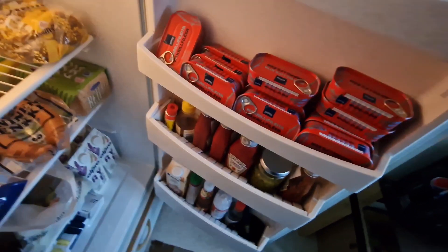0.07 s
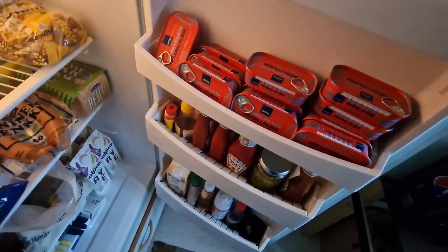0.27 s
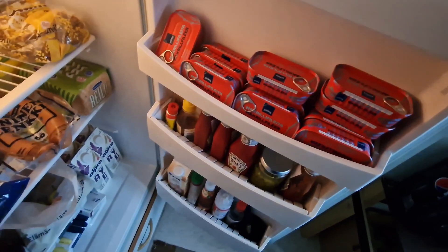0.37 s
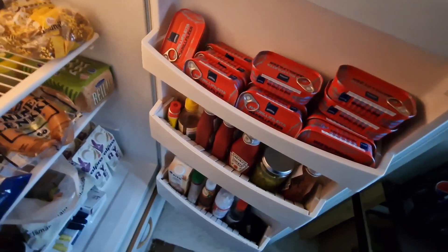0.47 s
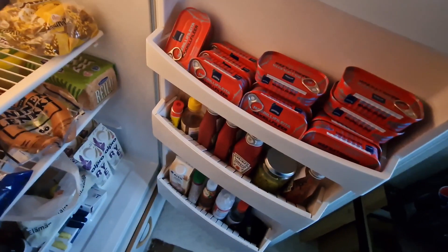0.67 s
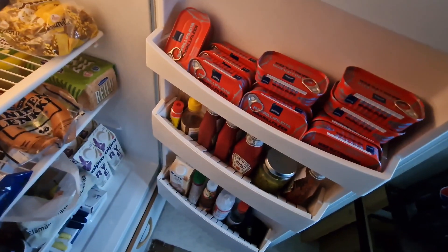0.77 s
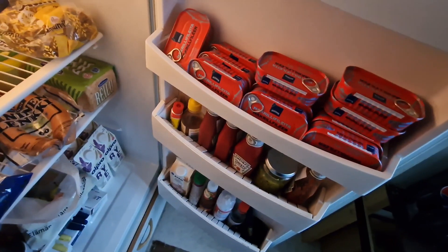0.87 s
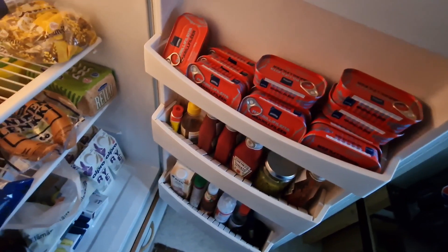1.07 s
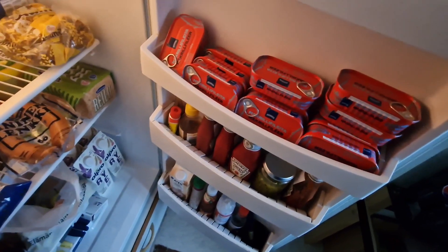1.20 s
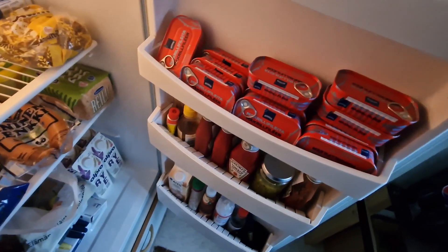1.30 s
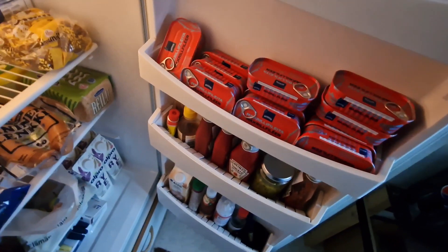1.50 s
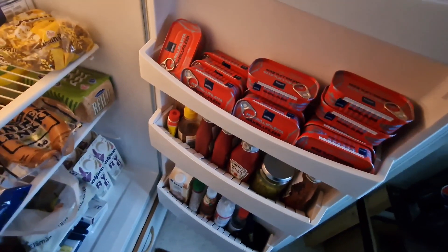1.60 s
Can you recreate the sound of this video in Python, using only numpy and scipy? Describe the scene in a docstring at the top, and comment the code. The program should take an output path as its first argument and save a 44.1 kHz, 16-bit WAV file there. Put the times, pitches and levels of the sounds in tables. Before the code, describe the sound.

Thin plastic wrap crumples close to a handheld phone at an open fridge. Only a faint airy motor hum until 0.17 s, then dense, bright crackling surges, with sharp snaps near 0.23, 0.45 and 0.57 s. It swells again around 0.7-0.95 s, thins near 1.1, revives at 1.2-1.3, then fades into scattered ticks, with a small renewed crackle at 1.64. Dull low handling bumps come around 0.95-1.4 s; short hard reflections.

```python
"""A fridge hums faintly, then a thin plastic wrap is crumpled and dragged close to a phone before its open door.
Fridge: shaped noise plus wavering motor tones. Hand on the phone: banded rumble and low decaying bumps.
Wrap: thousands of tiny noise bursts from spots of differing pitch, plus single loud snaps;
a shifting air pocket lifts one band, and the hard fridge inside adds a short noise-like tail."""
import sys
import numpy as np
from scipy import signal
from scipy.fft import rfft, irfft, next_fast_len
from scipy.io import wavfile
from scipy.ndimage import uniform_filter1d

SR = 44100
rng = np.random.default_rng(int(sys.argv[2]) if len(sys.argv) > 2 else 0)


def inscribe(sig):
    """Save sig as 16-bit PCM at rate SR to the path in sys.argv[1].

    A 1-D sig is mono; a 2-D sig holds one channel per row.
    Samples are clipped to [-1, 1] before scaling.
    """
    pcm = np.round(np.clip(np.atleast_2d(sig).T, -1, 1) * 32767)
    wavfile.write(sys.argv[1], SR, pcm.astype(np.int16))


N = 72765
T = np.arange(N) / SR
BODY_HZ = 895  # crossover between low body and treble
LAG_S, LAG_SPREAD_S = 0.00044, 0.0002418  # treble delay of left port: mean, spread over spots
BODY_LAG_S, BODY_LAG_SHARE = 0.0001, 0.09  # low-body delay: base, plus share of the treble delay
HAND_LR = np.array([[.8], [1.2]])  # hand gain at left, right port


def undb(db):
    """Amplitude ratio of a level in dB."""
    return 10 ** (np.asarray(db) / 20)


def unit(x):
    """Scale to unit rms."""
    return x / np.sqrt(np.mean(x ** 2))


def curve(table, col):
    """A table column over time; -120 before its first row."""
    a = np.array(table, float)
    return np.interp(T, a[:, 0], a[:, col], left=-120)


def table_db(table):
    """Gain in dB over log frequency, from (f/Hz, level/dB) rows."""
    a = np.array(table, float)
    return lambda hz: np.interp(np.log(hz), np.log(a[:, 0]), a[:, 1])


def slope(hz, corner_hz, order=4):
    """dB of a low-pass; a negative order makes a high-pass."""
    return -10 * np.log10(1 + (hz / corner_hz) ** order)


def bump(centre_hz, octaves, floor_db):
    """Broad hump in dB: 0 at the centre, floor_db far away."""
    return lambda hz: floor_db * (1 - np.exp(-.5 * (np.log2(hz / centre_hz) / octaves) ** 2))


def colour(x, db_of_hz, late_s=0.):
    """Zero-phase filter by a gain in dB per frequency, plus a delay."""
    n = next_fast_len(N + 4096)
    hz = np.maximum(np.arange(n // 2 + 1) * SR / n, 1)
    response = undb(db_of_hz(hz)) * np.exp(-2j * np.pi * hz * late_s)
    return irfft(rfft(x, n) * response, n)[..., :N]


def bursts(at_s, size, decay_s):
    """Random-sign noise whose power jumps at each time and decays exponentially."""
    kick = np.zeros(N)
    np.add.at(kick, np.clip((at_s * SR).astype(int), 0, N - 1), size ** 2)
    fade = np.exp(-2 / (decay_s * SR))
    envelope = np.sqrt(signal.lfilter([1 - fade], [1, -fade], kick))
    return envelope * np.sign(rng.standard_normal(N))


def ports(x, late_s, pan_db, shape, body=1.):
    """One spot at two ports: treble delayed at left and panned, low body nearly shared."""
    high = lambda hz: shape(hz) + slope(hz, BODY_HZ, order=-4)
    low = lambda hz: shape(hz) + slope(hz, BODY_HZ)
    body_late_s = BODY_LAG_S + BODY_LAG_SHARE * late_s
    left = colour(x, high, late_s) * undb(pan_db / 2) + body * colour(x, low, body_late_s)
    right = colour(x, high) * undb(-pan_db / 2) + body * colour(x, low)
    return np.array([left, right])


# fridge and kitchen air, relative spectrum: f/Hz, density/dB
AIR_SPECTRUM = [(18, -61), (30, -16), (218, -31), (311, -28.5), (344, -44), (400, -15.5), (466, -27),
                (571, -25), (617, -30), (700, -26.5), (1020, -38.5), (1620, -32.5), (1790, -40),
                (2200, -29), (2620, -43), (4360, -40), (5080, -55.5), (8440, -53), (13000, -69)]
# motor tones: f/Hz, mean level/dB
MOTOR_TONES = [(398.4, -63.5), (1421, -76), (1604, -72), (2046, -77)]
AIR_RMS_DB = -59.5  # shared (mid) part
DIM_START_S, DIM_RAMP_S, DIM_DB = 1.3, 0.18, -26  # hum below about 1 kHz grows fainter


def fridge():
    """Wide shaped air noise plus motor tones wavering in level and pitch."""
    mid, side = (colour(rng.standard_normal(N), table_db(AIR_SPECTRUM)) for _ in range(2))
    side = colour(side, table_db([(300, -9), (3000, 2)]))
    hum = undb(AIR_RMS_DB) * (mid + side * np.array([[1], [-1]])) / np.sqrt(np.mean(mid ** 2))
    for hz, db in MOTOR_TONES:
        waver, drift = (unit(uniform_filter1d(rng.standard_normal(N), 2500)) for _ in range(2))
        phase = 2 * np.pi * np.cumsum(hz * (1 + .004 * drift)) / SR
        hum = hum + undb(db + 5 * waver) * np.sin(phase)
    dim = undb(DIM_DB * np.clip((T - DIM_START_S) / DIM_RAMP_S, 0, 1))
    high = colour(hum, lambda hz: slope(hz, 1060, order=-4))
    low = colour(hum, lambda hz: slope(hz, 970))
    return high + dim * low


# handling rumble: t/s, level before trim/dB, deepest band re main/dB, creaky upper band re main/dB
GRIP_RUMBLE = [(0.16, -82, -10.5, -10.5), (0.185, -42, -22.5, 1), (0.208, -57, -23, -20),
               (0.408, -52, -28, -21), (0.524, -58, -9, -11), (0.558, -53.5, -26, 10),
               (0.674, -56.5, -21, 15), (0.724, -50, -23, 7.5), (0.782, -46, -25, 5.5),
               (0.812, -40.5, -3, -1), (0.91, -52, -12, 12), (0.948, -37.5, -4, -7),
               (1.01, -42.5, -8, -3.5), (1.044, -46.5, 1, -2), (1.106, -50.5, 7, -2), (1.2, -46.5, -6, 0.5),
               (1.242, -49, 5.5, -1), (1.308, -45.5, 0, -5), (1.362, -52, -7, -4), (1.424, -48.5, 4, -26),
               (1.516, -75, 22, -9), (1.612, -70, 3, 3), (1.65, -48, -33, -2)]
GRIP_TRIM_DB = -3.5


def grip():
    """Hand rubbing the phone: three noise bands of varying balance, nearly alike in both ports."""
    out = 0
    bands = ((67.4, 168, 0), (33, 37, curve(GRIP_RUMBLE, 2)), (214, 450, curve(GRIP_RUMBLE, 3)))
    for lo_hz, hi_hz, rel_db in bands:
        band = lambda hz: slope(hz, lo_hz, order=-8) + slope(hz, hi_hz, order=6)
        mid, side = (unit(colour(rng.standard_normal(N), band)) for _ in range(2))
        out = out + undb(rel_db) * (mid * HAND_LR + 0.36 * side * np.array([[1], [-1]]))
    return undb(curve(GRIP_RUMBLE, 1) + GRIP_TRIM_DB) * out


# hand effort: t/s, crumple level before trim and wrap filters/dB, low body re treble/dB
HAND_EFFORT = [(0.17, -58.5, 24), (0.186, -38, 8.5), (0.204, -35, 5), (0.24, -24.5, 2.5),
               (0.278, -29.5, 0.5), (0.31, -27.5, -1.5), (0.358, -33, -0.5), (0.38, -25, -0.5),
               (0.436, -32, -3.5), (0.545, -33, -2), (0.572, -29.5, -6), (0.626, -27, -0.5),
               (0.68, -35.5, -6), (0.696, -29, -9), (0.714, -34, -1.5), (0.78, -27, 0.5), (0.84, -24, 1),
               (0.886, -29.5, -4), (1.006, -35, 0), (1.068, -48, -6), (1.1, -40, 2), (1.122, -52.5, -12),
               (1.185, -47, -6), (1.2, -36, 4), (1.212, -28, 3), (1.232, -32, -16), (1.254, -27.5, -5),
               (1.3, -31, -13), (1.325, -38, -11), (1.364, -46.5, 10), (1.39, -37, -18), (1.41, -45, 11),
               (1.438, -34, -24), (1.484, -45.5, 2), (1.492, -40.5, -1), (1.55, -55, -17),
               (1.558, -45, 8.5), (1.62, -62, 4), (1.636, -40.5, 5), (1.65, -36, 2.5)]
CREASES, SPOTS = 3300, 14
CROWDING = .7  # crease rate ~ level ** CROWDING
CREASE_DECAY_S, SCATTER_DB, CRUMPLE_TRIM_DB = 0.00078, 1, 1
CALM_DB, CALM_SHARE = -45, .7  # weak effort: creases smaller and more even, down to this share


def crumple():
    """Random creases over spots of the wrap, each spot with its own pitch and direction."""
    effort_db = curve(HAND_EFFORT, 1)
    gain = undb(effort_db)
    rate = gain ** CROWDING
    rate = rate / rate.sum()
    draw, scatter = rng.random((CREASES, 2)), rng.standard_normal(CREASES)
    at_s = np.interp(draw[:, 0], np.cumsum(rate), T)
    lively = np.clip((np.interp(at_s, T, effort_db) - CALM_DB) / 8, CALM_SHARE, 1)
    size = unit(undb(SCATTER_DB * lively * np.clip(scatter, -3, 2.2)))
    # divide out crowding so the summed level follows effort
    size = lively * size * np.interp(at_s, T, gain / np.sqrt(rate * CREASES + 1e-12))
    spot = (draw[:, 1] * SPOTS).astype(int)
    body = undb(curve(HAND_EFFORT, 2))
    out = 0
    for k, (lag, pan) in enumerate(rng.standard_normal((SPOTS, 2))):
        x = bursts(at_s[spot == k], size[spot == k], CREASE_DECAY_S)
        pitch = bump(750 * 23 ** (k / SPOTS), 1.0, -7.5)
        out = out + ports(x, LAG_S + LAG_SPREAD_S * lag, 1.5 * pan, pitch, body)
    return undb(CRUMPLE_TRIM_DB) * out


# single loud creases: t/s, level before trim and filters/dB, centre f/Hz, treble pan L-R/dB
LOUD_SNAPS = [(0.184, -28.5, 5060, 0), (0.233, -17, 12000, 9), (0.2847, -35, 12000, -4),
              (0.4534, -19.5, 10000, 2), (0.5315, -18, 10900, 0.5), (0.5747, -13.5, 1870, 6),
              (0.908, -20, 2300, 0.0), (1.05, -24, 1400, -6), (1.072, -34, 13000, -3.5),
              (1.0796, -33, 6020, -8), (1.085, -31.5, 6940, 6), (1.0993, -28, 8050, -2.0),
              (1.1134, -46, 2140, 0), (1.142, -31, 12000, -1), (1.1528, -30, 1720, 7),
              (1.1676, -32, 3000, -7), (1.178, -30.5, 12500, -3), (1.19, -25, 6800, 6),
              (1.2138, -20, 11000, 0.0), (1.249, -18, 1800, 9), (1.291, -17, 13000, -3),
              (1.3331, -23, 4970, -6), (1.335, -20, 2350, 0.0), (1.457, -22, 1470, -3),
              (1.3887, -27.5, 13100, -5), (1.428, -27.5, 10500, 0.0), (1.4385, -33, 9000, -8),
              (1.441, -25.5, 9600, -3), (1.465, -25, 1480, 8), (1.4917, -26, 7500, 0),
              (1.518, -31.5, 8090, -3), (1.5547, -27.5, 5140, 3), (1.5625, -38.5, 1630, 0),
              (1.578, -40, 3500, 4), (1.5824, -34, 3500, 1), (1.63, -38, 6000, 1.0),
              (1.6381, -25.5, 5900, 0.0), (1.6464, -26.5, 4500, 0)]
SNAP_DECAY_S, SNAP_TRIM_DB = 0.001, -3.5
SNAP_BODY_DB = -8.5  # a single crease has little low body
RING_BELOW_HZ, RING_OCTAVES, WIDE_OCTAVES = 2600, .15, .9  # low snaps ring in a narrow band


def snaps():
    """Loud single creases, each a decaying burst round its own pitch."""
    out = 0
    for (s, db, hz, pan_db), lag in zip(LOUD_SNAPS, rng.standard_normal(len(LOUD_SNAPS))):
        size = undb(np.array([db + SNAP_TRIM_DB])) * np.sqrt(SNAP_DECAY_S * SR)
        x = bursts(np.array([s]), size, SNAP_DECAY_S)
        octaves = RING_OCTAVES if hz < RING_BELOW_HZ else WIDE_OCTAVES
        late_s = LAG_S + LAG_SPREAD_S * lag
        out = out + ports(x, late_s, pan_db, bump(hz, octaves, -12), undb(SNAP_BODY_DB))
    return out


# air pocket of the wrap, changing shape: t/s, resonance f/Hz, lift/dB
AIR_POCKET = [(0.18, 1690, 8.5), (0.216, 1740, 5), (0.286, 1370, 5.5), (0.522, 1730, 3), (0.72, 1590, 3.5),
              (0.772, 1350, 8), (0.908, 2010, 0.5), (0.936, 1660, 4), (1.006, 1990, 1), (1.056, 1220, 7.5),
              (1.104, 1710, 1.5), (1.154, 1390, 9), (1.19, 1600, 6), (1.292, 1600, 0), (1.346, 2110, 6.5),
              (1.408, 1560, 4), (1.482, 1460, 2), (1.514, 1680, 10), (1.65, 1720, 7.5)]
POCKET_OCTAVES, FRAME = .3, 1024  # FRAME: hop in samples
TAIL_DB, TAIL_T60_S, TAIL_HZ = -4, 0.14, 6400  # energy before low-pass, decay, low-pass corner


def surroundings(x):
    """Per frame: the air pocket lifts its band; the moving wrap finds new echoes in the fridge."""
    size, t = 8 * FRAME, T[:4 * FRAME]
    hz = np.maximum(np.arange(size // 2 + 1) * SR / size, 1)
    low, high = undb(slope(hz, BODY_HZ)), undb(slope(hz, BODY_HZ, order=-4))
    damping = undb(slope(hz, TAIL_HZ, order=2))
    fall = np.exp(-np.log(1000) * t / TAIL_T60_S) * (t > .001)
    fall = fall / np.sqrt(np.sum(fall ** 2)) * undb(TAIL_DB)
    arch = np.sin(np.pi * np.arange(2 * FRAME) / (2 * FRAME))
    # one-frame delay makes room for pre-ringing; undone on overlap-add
    delay = np.exp(-2j * np.pi * hz * FRAME / SR)
    x, out = np.pad(x, ((0, 0), (0, 2 * FRAME))), np.zeros((2, N + 2 * size))
    centre, lift = curve(AIR_POCKET, 1), curve(AIR_POCKET, 2)
    for i in range(FRAME, N, FRAME):
        j = int(np.clip(i + FRAME, AIR_POCKET[0][0] * SR + 1, N - 1))
        pocket = undb(lift[j] + bump(centre[j], POCKET_OCTAVES, -lift[j])(hz)) * delay
        echo = rfft(rng.standard_normal((3, len(t))) * fall, size)
        echo = (echo[:2] * high + echo[2] * low) * damping  # treble apart, low body shared
        part = x[:, i:i + 2 * FRAME] * arch
        heard = rfft(part * arch, size) + echo * rfft(part, size)
        out[:, i - FRAME:i - FRAME + size] += irfft(pocket * heard, size)
    return out[:, :N]


# colour of the wrap, before a fixed lift: f/Hz, gain/dB
WRAP_COLOUR = [(88, 3), (150, -10), (297, -10.5), (328, -13.5), (484, -5.5), (941, -7.5), (1210, -3),
               (1420, -6.5), (2270, -5), (2500, -4.5), (3220, -8.5), (7470, -4.5), (10800, -10.5),
               (15100, -5), (16000, -29)]
# lean of the microphone pair: f/Hz, L-R/dB
PORT_LEAN = [(60, 2), (110, 0.5), (200, 9.5), (380, -7), (700, 1), (1290, 10), (2380, 3), (4400, -6.5),
             (8120, 0.5), (15000, -2)]
WRAP_LOW_HZ, WRAP_LIFT_DB = 110, 12  # the wrap is too light to sound below WRAP_LOW_HZ


def wrap_colour(x):
    """Spectrum of the thin wrap, split unevenly between the two ports."""
    lean = table_db(PORT_LEAN)

    def body(hz):
        """Wrap gain in dB, held flat above 15.1 kHz."""
        shape = table_db(WRAP_COLOUR)(np.minimum(hz, 15100))
        return shape + slope(hz, WRAP_LOW_HZ, order=-8) + WRAP_LIFT_DB

    left = colour(x[0], lambda hz: body(hz) + lean(hz) / 2)
    right = colour(x[1], lambda hz: body(hz) - lean(hz) / 2)
    return np.array([left, right])


# fingers bump the phone: t/s, envelope peak before port gains/dB, f/Hz
FINGER_BUMPS = [(0.95, -39, 86), (1.032, -35.5, 82), (1.072, -45, 45.3), (1.288, -38.5, 72),
                (1.384, -44, 88.5), (1.406, -40.5, 100.4)]
BUMP_CYCLES = 1.26  # cycles from onset to envelope peak


def bumps():
    """Fingers knocking the phone: low sines that swell and die within a few cycles."""
    out = 0
    for s, db, hz in FINGER_BUMPS:
        turns = np.maximum(T - s, 0) * hz / BUMP_CYCLES
        envelope = undb(db) * (turns * np.exp(1 - turns)) ** 2
        out = out - envelope * np.sin(2 * np.pi * hz * (T - s)) * HAND_LR
    return out


def scene():
    """Wrap in its surroundings, hand on the phone, fridge."""
    wrap = wrap_colour(surroundings(crumple() + snaps()))
    return fridge() + grip() + wrap + bumps()


def roll_off(x):
    """The treble ends steeply here."""
    return signal.sosfilt(signal.butter(12, 17010, fs=SR, output="sos"), x)


def record(dry):
    """The phone cuts the top with a steep 15.85 kHz low-pass."""
    low_pass = signal.ellip(12, .2, 70, 15850, fs=SR, output="sos")
    mix = signal.sosfilt(low_pass, dry)
    return roll_off(mix)


dry = scene()
out = record(dry)
inscribe(out)
```